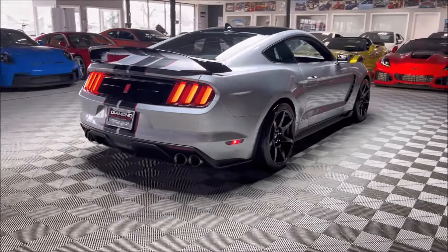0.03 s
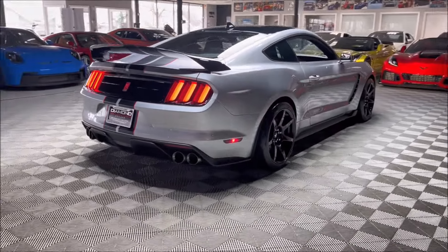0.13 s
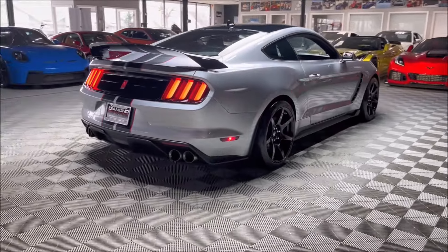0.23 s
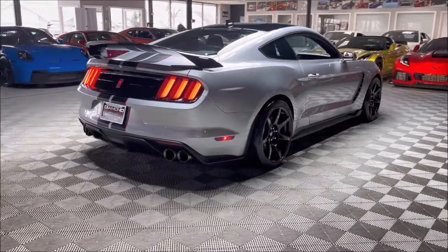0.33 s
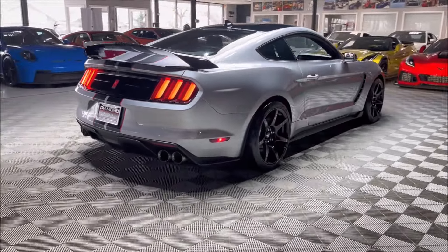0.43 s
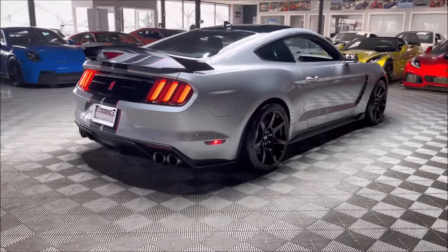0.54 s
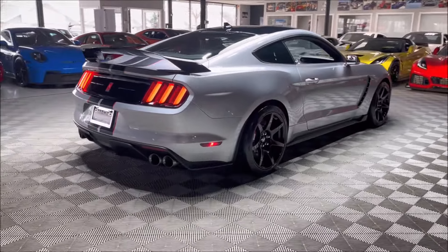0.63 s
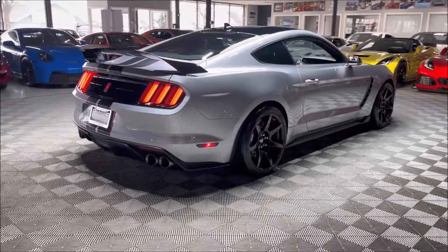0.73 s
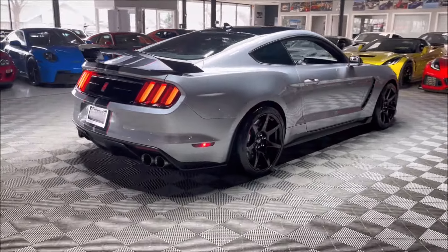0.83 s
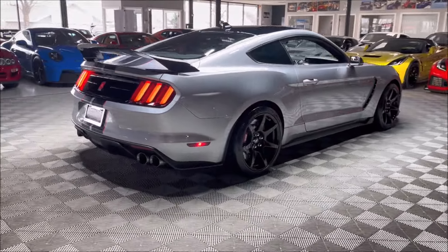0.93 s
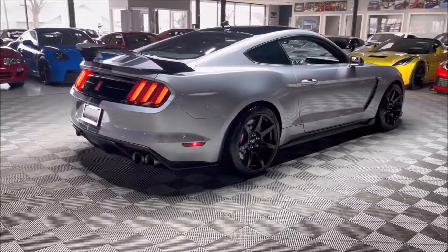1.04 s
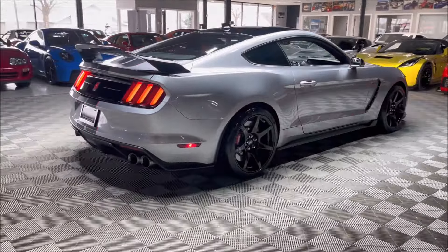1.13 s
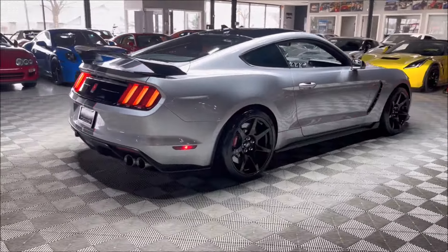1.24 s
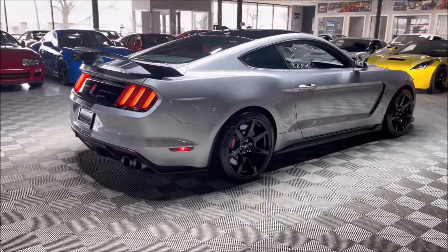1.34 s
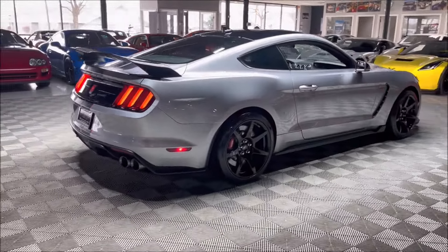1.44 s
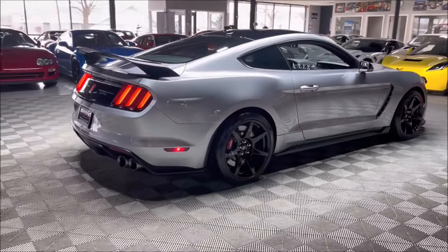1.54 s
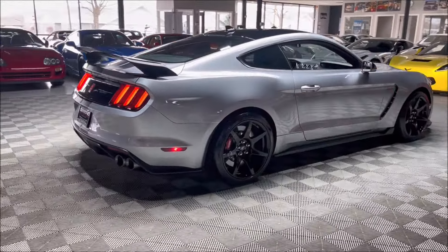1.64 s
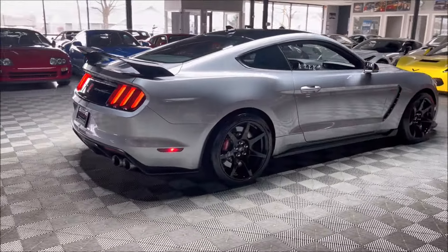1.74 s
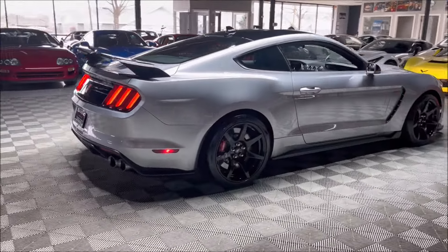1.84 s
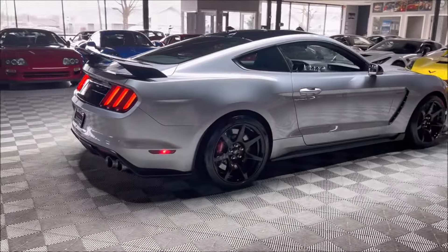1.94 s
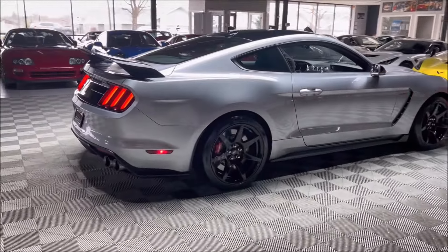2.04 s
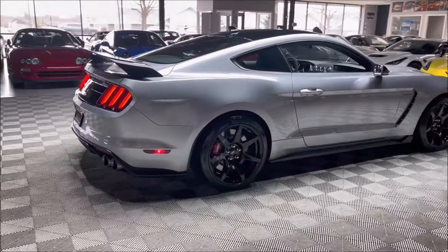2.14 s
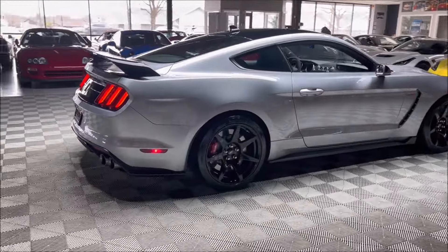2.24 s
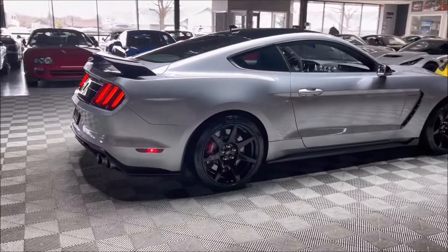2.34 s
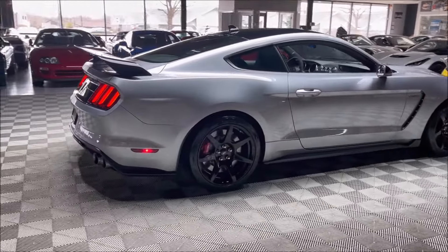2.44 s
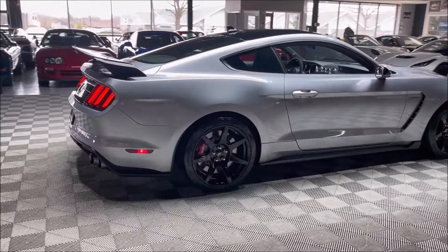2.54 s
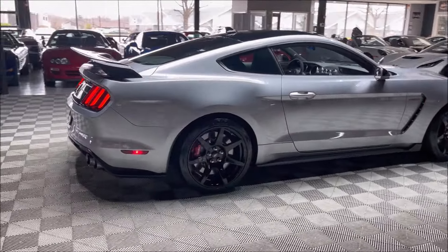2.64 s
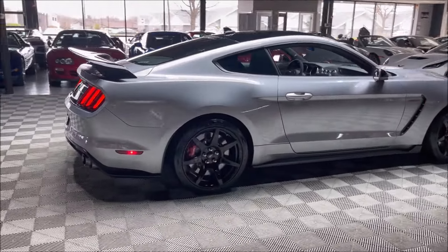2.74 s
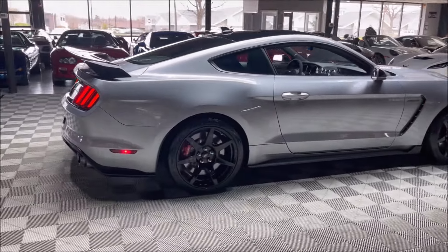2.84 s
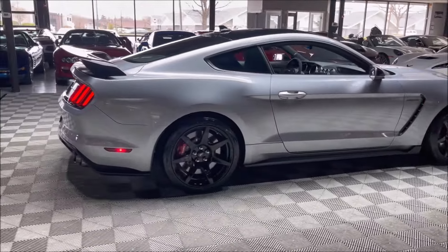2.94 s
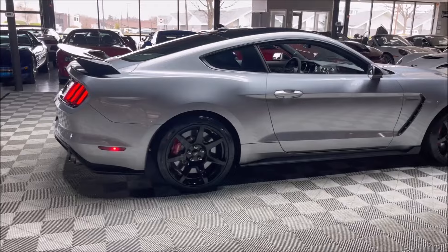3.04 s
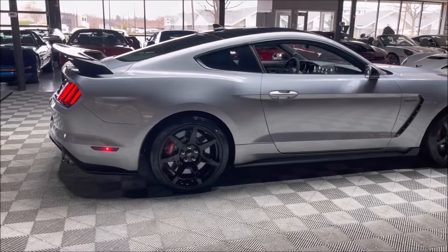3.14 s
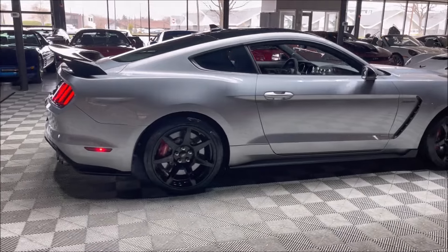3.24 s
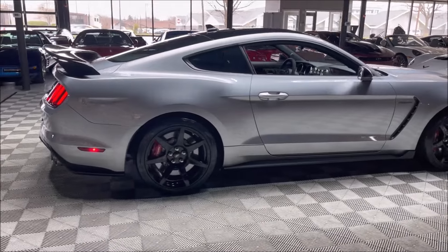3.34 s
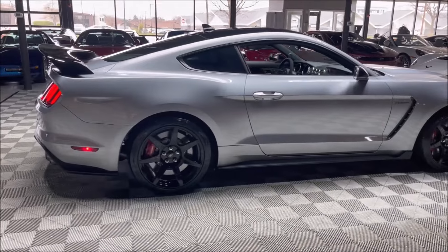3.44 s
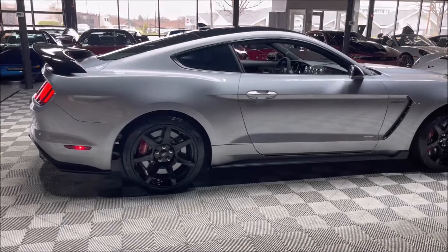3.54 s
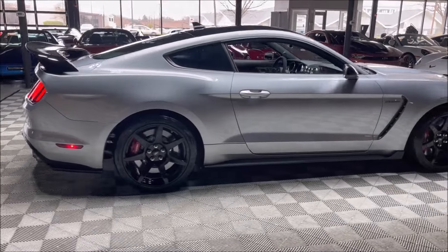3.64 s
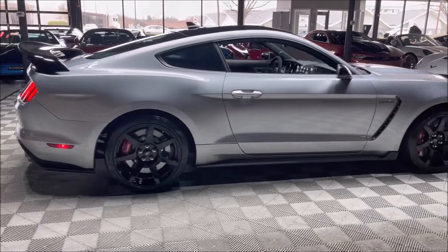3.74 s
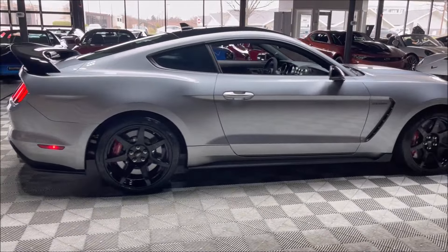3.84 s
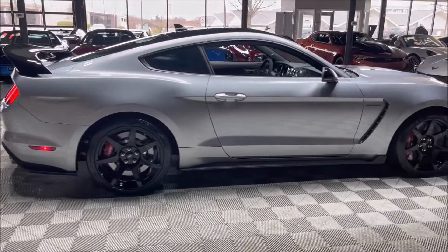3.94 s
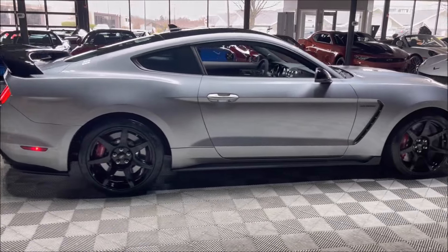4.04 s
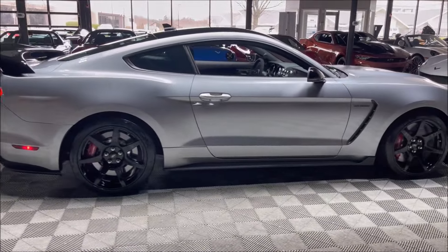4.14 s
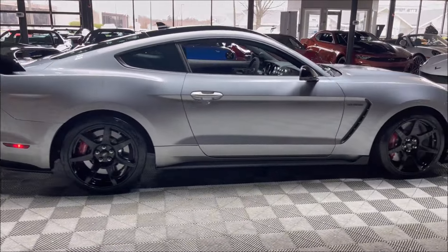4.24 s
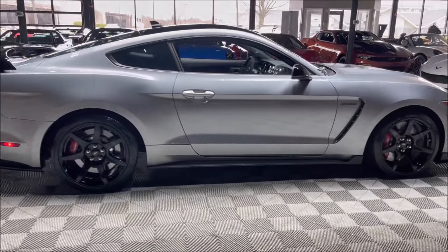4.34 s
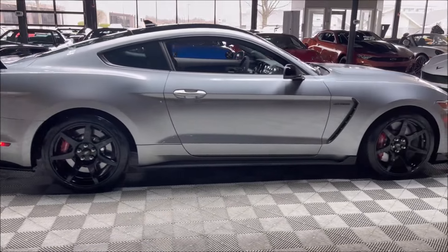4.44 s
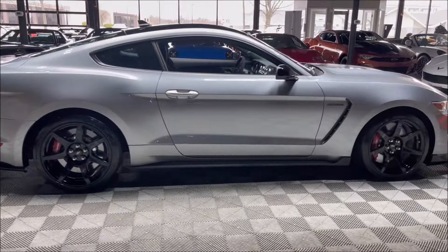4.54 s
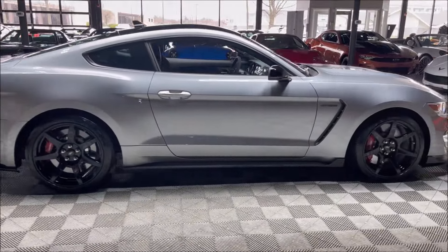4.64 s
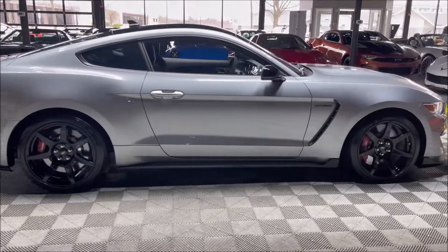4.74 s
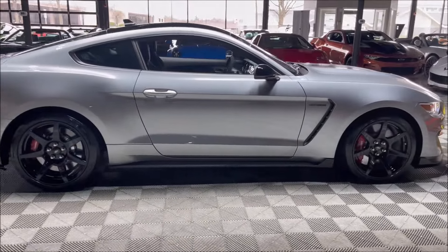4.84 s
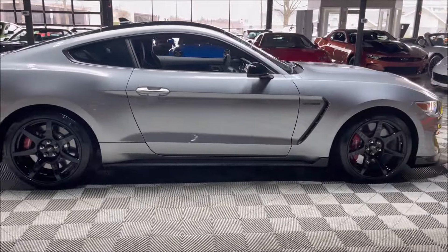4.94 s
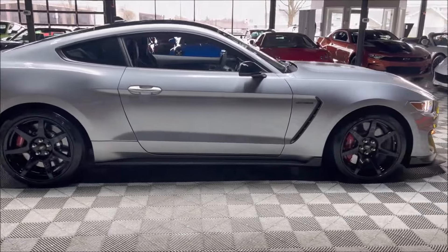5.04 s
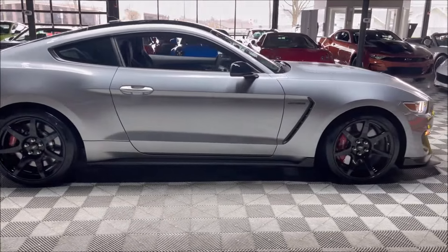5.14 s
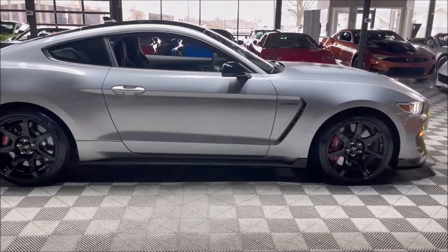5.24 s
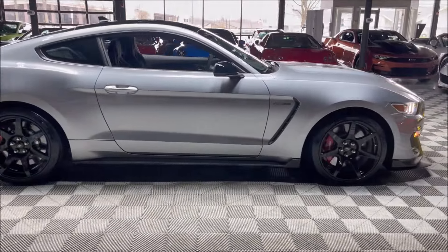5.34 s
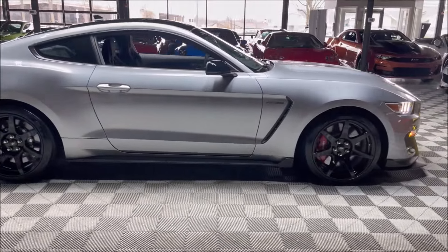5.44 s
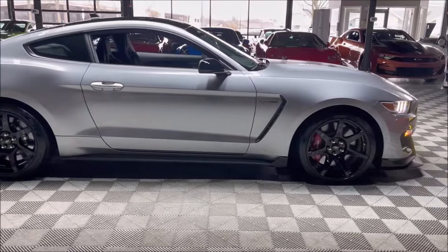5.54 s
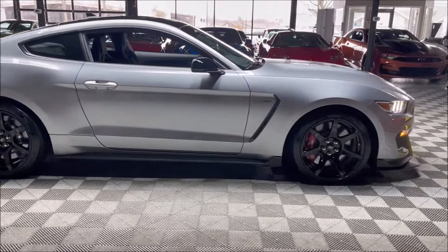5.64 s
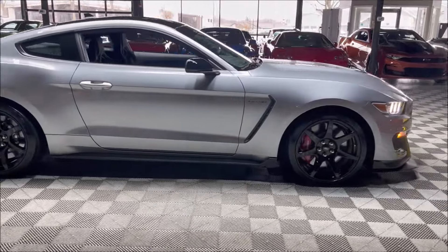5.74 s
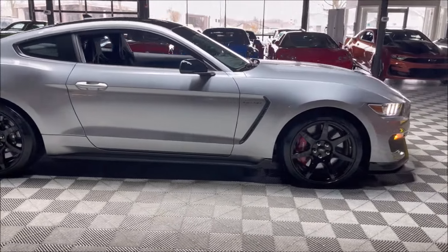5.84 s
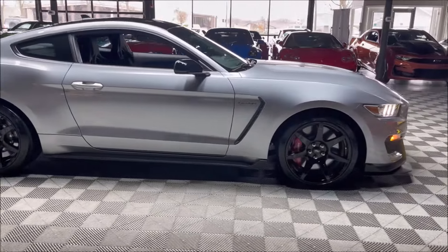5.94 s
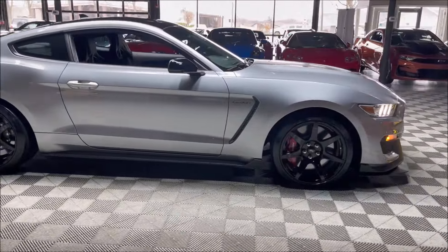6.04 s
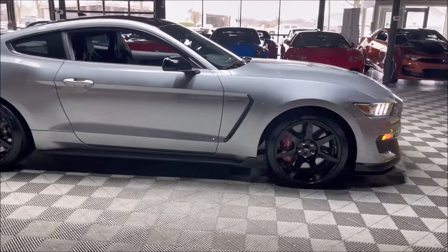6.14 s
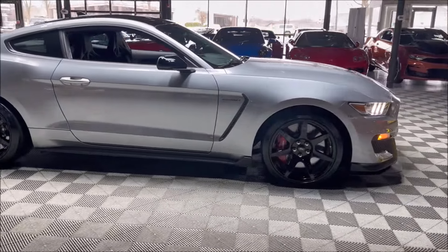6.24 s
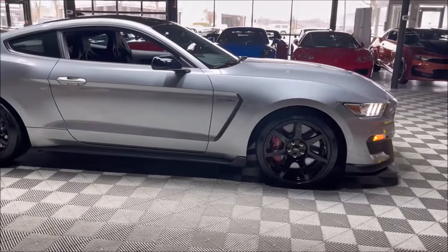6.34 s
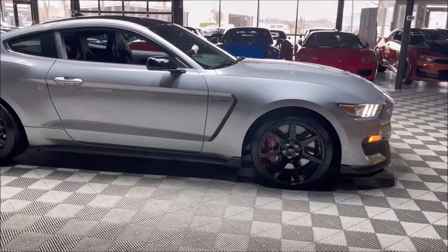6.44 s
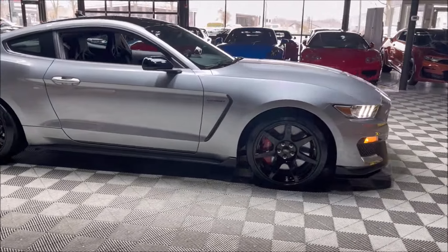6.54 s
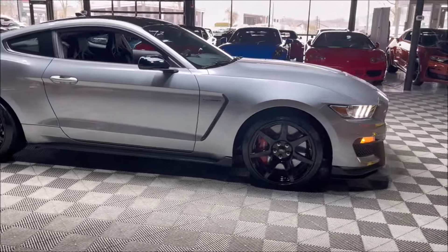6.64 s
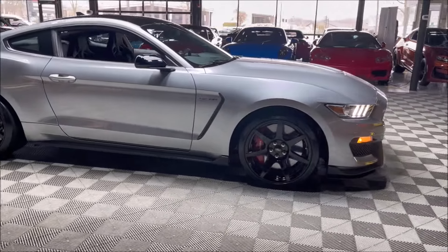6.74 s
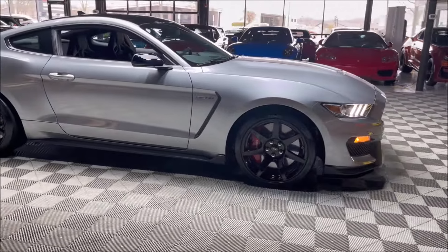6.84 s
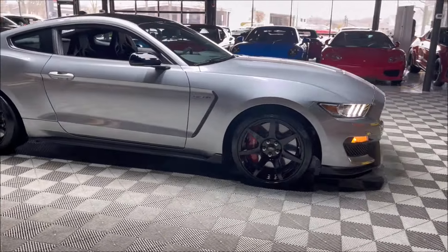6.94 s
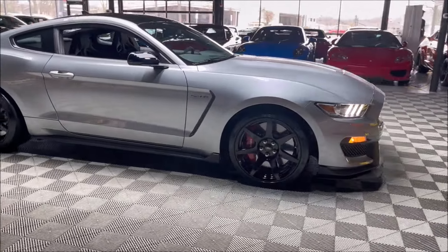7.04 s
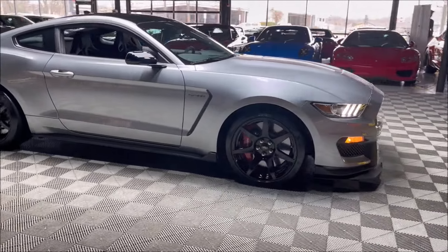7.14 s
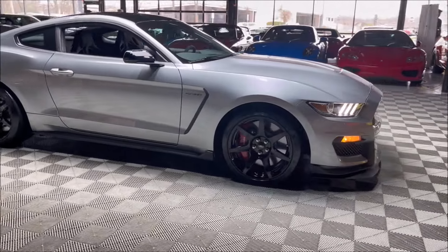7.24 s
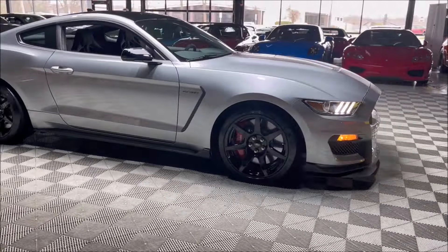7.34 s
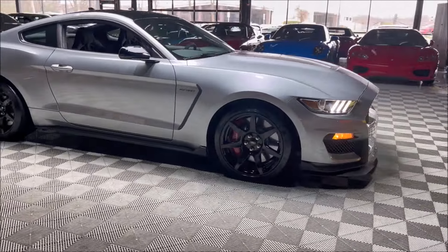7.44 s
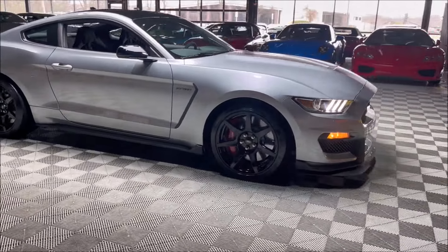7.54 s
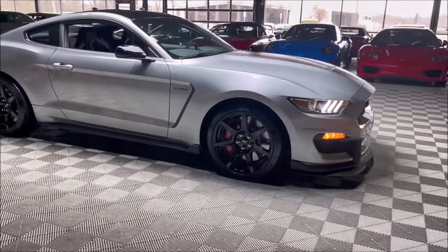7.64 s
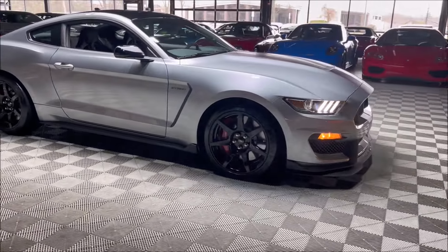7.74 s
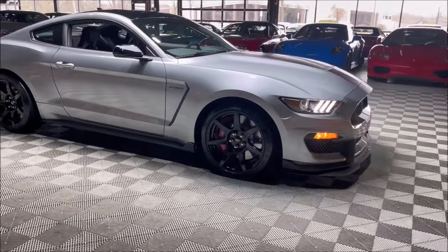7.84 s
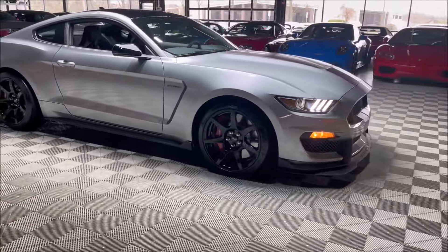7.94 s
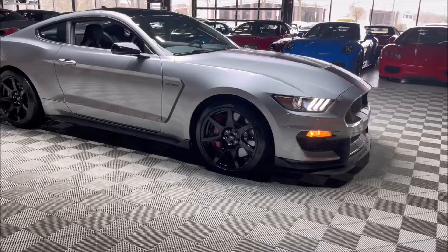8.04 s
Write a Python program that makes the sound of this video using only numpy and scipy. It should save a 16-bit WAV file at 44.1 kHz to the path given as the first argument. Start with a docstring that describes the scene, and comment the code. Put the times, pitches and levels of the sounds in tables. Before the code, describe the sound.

A big eight-cylinder petrol engine idles from start to finish, about eight seconds, in a hard-floored showroom. Its deep firing tone, near 53 hertz, drones loudly with only slight speed wander; there is no revving. Above it lie a lumpy, uneven burble repeating several times a second, pulsing breathy exhaust gas and faint mechanical rustle. During the first second a loose tailpipe tip knocks and rattles irregularly, thin and metallic near 2.9 kilohertz, fading away by about 3. The close stereo microphone moves from tail to nose, so gas noise gradually softens and light valve-gear noise becomes slightly clearer. The bass weakens from 3.5, almost drops out around 4.6, returns near 5, sinks again around 5.9, stays thin until 6.5, then swells back through the end. Tiny dry, bright clicks come near 0.4, 1.8, 3.1, 5.7, 6.3, 6.9 and 7.6.

```python
"""A big eight-cylinder petrol engine idles in a hard-floored showroom; two microphone ports move from tail to nose.
From the start the firing tone booms, unequal cylinders fill in the orders of the four-stroke cycle, and gas puffs
and valve gear rustle above. A loose tailpipe tip, ringing at each knock, rattles early on and fades.
A few dry noise-burst clicks sound nearby, from the first second to the last.
In the second half the firing tone sinks at two nulls of the hall's standing wave."""
import sys
import numpy as np
from scipy import signal
from scipy.fft import rfft, irfft
from scipy.io import wavfile
from scipy.ndimage import uniform_filter1d

SR = 44100
rng = np.random.default_rng(int(sys.argv[2]) if len(sys.argv) > 2 else 0)


def store_pcm(level_fs):
    """Save levels as 16-bit WAV."""
    pcm = np.round(np.clip(level_fs, -1, 1) * 32767).astype(np.int16)
    wavfile.write(sys.argv[1], SR, np.atleast_2d(pcm).T)


N = 356328
TOP_HZ = 15700

# noise colour and its sharing between the ports, levels relative:
# [f/Hz, sum level/dB, difference level/dB, linked share 0-1]
PORT_SPECTRA = [(30, -86.5, -120, 1), (130, -74, -90, 1), (200, -66, -82.5, .85), (332, -66, -77.5, 0.7),
                (444, -67, -75, .6), (695, -69.5, -72.5, 0.4), (1010, -76, -77, 0.2),
                (1250, -80.5, -83.5, .2), (1490, -80.5, -78.5, .1), (1590, -78, -75, .1),
                (1660, -78, -83.5, .1), (1900, -79, -87.5, .2), (2540, -83.5, -89, .4),
                (3020, -85.5, -89, .4), (3700, -89, -93, .3), (4500, -94, -97, .1), (6000, -98, -101, .1),
                (7300, -101, -96, .3), (7700, -112, -95, .3), (8800, -112, -94, .3), (9300, -101, -96, .7),
                (10200, -98, -98, .75), (10500, -102, -104, .5), (13000, -106, -113, .1),
                (13900, -112, -110, .1), (15000, -130, -109, .1)]


def undb(db):
    """Amplitude ratio of a level in decibels."""
    return 10 ** (np.asarray(db) / 20)


def unit(x):
    """Normalisation to a root-mean-square value of 1."""
    return x / np.sqrt(np.mean(np.abs(x) ** 2))


def curves(table):
    """Linear interpolation in time: each column after t/s, sample by sample."""
    s, *columns = np.transpose(table)
    return [np.interp(np.arange(N) / SR, s, c) for c in columns]


def frequencies():
    """Frequencies of the Fourier bins in Hz, at least 1 so that a logarithm exists."""
    return np.maximum(np.arange(N // 2 + 1) * SR / N, 1)


def log_interp(f, hz, values):
    """Interpolation on a logarithmic frequency axis."""
    return np.interp(np.log(f), np.log(hz), values)


def band(x, lo_hz, hi_hz, order=2):
    """Band-pass filtering with a maximally flat response."""
    return signal.sosfilt(signal.butter(order, [lo_hz, hi_hz], "bandpass", fs=SR, output="sos"), x)


def wander(rate, count, size):
    """Band-limited complex chance: smooth rows that change about rate times a second."""
    knots = int(8 + rate * N / SR)
    z = rng.standard_normal((count, knots)) + 1j * rng.standard_normal((count, knots))
    return unit(signal.resample(z, size, axis=1))


def handover(tail_db, nose_db, half_s, spread_s):
    """Logistic transition of a level from its value at the tail towards its value at the nose."""
    return tail_db + (nose_db - tail_db) / (1 + np.exp(-(np.arange(N) / SR - half_s) / max(spread_s, .05)))


def spots(level_db, *places):
    """Interference along a path: a steady level with bell-shaped loud or dead spots."""
    t = np.arange(N) / SR
    return level_db + sum(db * np.exp(-((t - s) / width) ** 2) for s, width, db in np.reshape(places, (-1, 3)))


def engine_cycle():
    """Phase is the integral of rate: four-stroke cycles run so far, with eight firings in each."""
    # idle speed: [t/s, firing rate f/Hz]
    idle = [(0.15, 52.79), (0.4, 52.61), (1.0, 53.31), (1.85, 53.97), (2.2, 53.74), (2.6, 53.05),
            (3.15, 53.25), (3.7, 53.1), (4.05, 52.55), (4.9, 53.7), (6.35, 53.9), (6.95, 53.17),
            (7.9, 52.8)]
    return np.cumsum(curves(idle)[0]) / SR / 8


def tones(cycle):
    """Periodic firing drives clean pipe tones at 1, 1.5 and 2 times its rate, each a little unsteady."""
    # firing tone along the walk through the standing wave: [t/s, level/dB]
    boom = [(0.1, -7.5), (2.37, -8.5), (3.31, -10.5), (3.93, -13), (4.48, -27.5), (4.57, -44.5),
            (4.68, -18), (4.81, -12.5), (4.96, -12), (5.23, -15.5), (5.54, -14.5), (5.75, -17),
            (5.91, -34.5), (6.04, -21), (6.48, -21.5), (6.85, -13.5), (8.0, -11.5)]
    # upper pipe tones along the walk: [t/s, level at 1.5 x firing/dB, level at 2 x firing/dB]
    overtones = [(0.6, -33.5, -34.5), (1.5, -40.5, -31.5), (2.15, -36.5, -30.5), (2.6, -34, -37),
                 (3.6, -30, -39), (4.85, -28, -41), (5.75, -36.5, -27), (6.6, -47, -23),
                 (7.1, -32.5, -27.5), (7.6, -37, -32.5)]
    levels_db = [*curves(boom), *curves(overtones)]
    shake = 1 + wander(9, count=3, size=N) * np.array([[.015], [.15], [.2]])
    turns = np.array([[8], [12], [16]]) * cycle
    waves = np.imag(shake * np.exp(2j * np.pi * turns))
    return np.sqrt(2) * np.sum(undb(levels_db) * waves, axis=0)


def burble(cycle, drift=.6, rough=.4, sweep=.045, lope_db=-27.5, step=20):
    """Fourier orders of unequal cylinders; echoes reshuffle them on the walk, and no two cycles match."""
    # orders of the four-stroke cycle: [multiple of the cycle rate, relative level/dB]
    orders = [(4, -58), (7, -44), (9, -36), (10, -36), (11, -44), (14, -46), (15, -47), (17, -46),
              (18, -33), (19, -46), (20, -39), (21, -37), (24, -38), (25, -40), (26, -39), (27, -39),
              (28, -48), (32, -48), (33, -44), (34, -37), (35, -42), (36, -42), (37, -44), (38, -44),
              (42, -41), (44, -46), (45, -40), (48, -43), (49, -45), (50, -41), (54, -50), (55, -49),
              (56, -41), (57, -52), (63, -52), (64, -52)]
    # exhaust resonances, the first around the firing tone:
    # [highest order carried, place in the cycle where it rings 0-1, spread of that place 0-1]
    chambers = [(15, .3, .5), (22, .1, .2), (30, .53, .18), (39, .42, .11), (47, .5, .15), (51, .79, .08),
                (65, .98, .3)]
    # the other six resonances, with two loud or dead spots each in the hall:
    # [level/dB, t/s, half width/s, change/dB, second t/s, half width/s, change/dB]
    hall_spots = [(-30.5, 5.3, 1.1, 4.5, 3.2, 0.74, -4), (-30.5, 1.7, .3, -9.5, 5.13, .4, -7),
                  (-35.5, 3.76, 1.87, 6, .9, .3, 4.5), (-37.5, 2.3, 0.7, 8, 4.8, .9, 4.5),
                  (-35, 2.4, 0.45, -5.5, 6.5, 0.94, -5), (-39, 4.7, .9, 4.5, 1.3, 1.5, 4)]
    order, db = np.transpose(orders)[:, :, None]
    order = np.round(order)
    slow = cycle[::step]  # low orders need only a low sample rate
    top, place, spread = np.transpose(chambers)
    chamber = np.searchsorted(np.round(top), order[:, 0])

    # the deepest orders are the steadiest
    roughness = rough * np.minimum(order / 24, 1)
    gain = 1 + drift * wander(1.3, count=len(order), size=len(slow))
    gain = gain + roughness * wander(12, count=len(order), size=len(slow))

    # orders of one resonance line up where it rings, which makes a beat once a cycle
    start = spread[chamber, None] * rng.standard_normal(order.shape)
    # higher orders arrive later, so each beat glides upward
    start -= sweep * (order - top[chamber, None] + 4) ** 2 / 2
    turns = order * (slow - place[chamber, None]) + start
    waves = undb(db) * np.imag(gain * np.exp(2j * np.pi * turns))

    levels_db = [np.full(N, lope_db), *[spots(*row) for row in hall_spots]]
    rings = [unit(waves[chamber == k].sum(axis=0)) * undb(level[::step]) for k, level in enumerate(levels_db)]
    return signal.resample_poly(np.sum(rings, axis=0), step, 1)[:N]


def puffs(cycle, decay, scatter_db, steady):
    """Impulsive excitation and decay: a jump at each firing dies away into the hall's steady wash."""
    # puff strength of the cylinders in firing order: [relative level/dB]
    cylinders = [0, -3, -1, -4, 0, -3, -1, -4]
    firing = 8 * cycle
    k = firing.astype(int)
    scatter = scatter_db * rng.standard_normal(k[-1] + 1)
    size = undb(np.array(cylinders)[k % 8] + scatter[k])
    decaying = size * np.exp(-(firing - k) / decay)
    return unit(steady + uniform_filter1d(decaying, size=300))


def repeating(cycle, firing_share, hold_s):
    """Cyclostationary noise, partly alike at every firing; its pattern changes as the echo paths do."""
    size, count = 6400, 40  # points in a cycle, patterns in stock
    each_firing = np.tile(rng.standard_normal((count, size // 8)), 8)
    patterns = firing_share * each_firing + rng.standard_normal((count, size))
    spot = np.arange(N) / SR / hold_s
    i = (cycle % 1 * size).astype(int)
    k = spot.astype(int)
    fade = np.pi / 2 * (spot - k)  # equal-power crossfade
    return unit(patterns[k % count, i] * np.cos(fade) + patterns[(k + 1) % count, i] * np.sin(fade))


def rustle_levels():
    """Distance and shielding: levels in dB of three gas bands, two block bands, valve gear and hiss on the walk."""
    # exhaust gas, lower block, upper block, valve gear, hiss:
    # [level at the tail/dB, level at the nose/dB, halfway t/s, spread/s]
    tail_to_nose = [(-36, -39.5, 3.6, 1.2), (-48, -53, 2.3, 0.25), (-53, -51.5, 5.2, .4),
                    (-55.5, -52, 4.3, 0.34), (-61, -59.5, 2.2, .5)]
    # low, middle and upper gas against the gas level: [relative level/dB]
    gas_bands = [0, -4.5, -8]
    # beside the car; added to middle gas and taken from low gas: [t/s, change/dB]
    flank = [(0, -3), (1.5, 0), (2.8, 0), (4.2, 2.5), (5.5, 0.5), (6.5, -0.5), (8, -0.5)]
    gas_db, *metal_db = [handover(*row) for row in tail_to_nose]
    low_db, middle_db, upper_db = gas_db + np.array(gas_bands)[:, None]
    flank_db = curves(flank)[0]
    return [low_db - flank_db, middle_db + flank_db, upper_db, *metal_db]


def rustle(cycle):
    """Amplitude-modulated noise of gas, block, gear and hiss; a second draw feeds the ports' difference."""
    # narrow pipe and panel resonances: [f/Hz, width/Hz, lift/dB]
    pipes = [(402, 7.1, 2.5), (440, 9.9, 3.5), (476, 20, 1.5), (526, 13, 3), (584, 26, 5), (660, 21, 7),
             (761, 30, 6.5), (840, 25, 5.5), (922, 27, 5.5), (1055, 23, 6), (1450, 23, 5.5),
             (1714, 36, 4.5), (2900, 240, 1.5)]
    # handover between the seven bands, from low gas up to hiss: [f/Hz]
    splits = [558, 821, 1234, 1750, 2440, 4180]
    # low, middle, upper gas, lower, upper block, gear, hiss:
    # [relative gain of the repeating part, steady wash under the puffs]
    pulsing = [(2., 1.3), (2.2, 1.3), (1.6, 1.3), (1.3, 1.2), (1.3, 1.2), (.8, 1.4), (.2, 1.6)]
    hz, sum_db = np.transpose(PORT_SPECTRA)[:2]
    f = frequencies()
    resonance_db = sum(db / (1 + (2 * (f - centre) / width) ** 2) for centre, width, db in pipes)
    colour = undb(log_interp(f, hz, sum_db)) * undb(resonance_db)
    below = [0] + [1 / (1 + (f / split) ** 12) for split in splits] + [1]
    levels_db = rustle_levels()
    out = 0
    for k, (repeat, steady) in enumerate(pulsing):
        pattern = np.array([repeating(cycle, firing_share=.5, hold_s=.6) for _ in range(2)])
        noise = repeat * pattern + rng.standard_normal((2, N))
        noise *= puffs(cycle, decay=.5, scatter_db=2.8, steady=steady)  # decay in firing intervals
        noise *= undb(.8 * wander(7, count=1, size=N).real)  # each band swells on its own
        window = colour * (below[k + 1] - below[k])
        out = out + unit(irfft(rfft(noise) * window, N)) * undb(levels_db[k])
    return out


def shaken(cycle, times, place, level_db, scatter_db, hz, spread_hz, fade_s):
    """Forced impacts, times a cycle at a place 0-1 between repeats, lost as the ports leave the tail."""
    s = np.flatnonzero(np.diff(np.floor(times * cycle - place))) / SR
    chance = rng.standard_normal((len(s), 2))
    strength_db = level_db + scatter_db * chance[:, 0] - 9 * (s / fade_s) ** 2
    return np.c_[s, strength_db, hz + spread_hz * chance[:, 1]][s < 2 * fade_s]


def rattle(cycle, attack_s=.0006, decay_s=.007, partner_hz=120, buzz_db=-57, fade_s=1.6):
    """Damped modal ringing of a loose tailpipe tip, with a faint valve tick once a cycle; the tip's buzz
    between knocks fades as the ports leave the tail."""
    # main knocks: [t/s, level/dB, ring f/Hz]
    main_knocks = [(0.0893, -42, 2980), (0.1292, -35.5, 2880), (0.227, -42.5, 2910), (0.3197, -44, 2790),
                   (0.3572, -36, 2900), (0.3943, -33, 2970), (0.4355, -45, 2930), (0.4714, -48.5, 3020),
                   (0.5088, -45, 2880), (0.5852, -32, 2720), (0.659, -45, 2740), (0.6974, -42, 2820),
                   (0.8111, -37, 2760), (0.887, -45.5, 2860), (0.9608, -38, 2980)]
    # lesser knocks: [level/dB, scatter/dB, ring f/Hz, spread/Hz, t/s by which 9 dB is lost]
    small_knocks = (-43, 3, 2880, 100, 1.5)
    # faint higher tick: [level/dB, scatter/dB, ring f/Hz, spread/Hz, t/s by which 9 dB is lost]
    faint_tick = (-50, 3, 5100, 120, 1.6)
    small = shaken(cycle, 4, .41, *small_knocks)
    ticks = shaken(cycle, 1, .75, *faint_tick)
    out, t = np.zeros(N), np.arange(1500) / SR
    envelope = (1 - np.exp(-t / attack_s)) * np.exp(-t / decay_s)
    close_modes = .55 + .45 * np.cos(2 * np.pi * partner_hz * t)  # one on each side of the ring
    for s, db, hz in [*main_knocks, *small, *ticks]:
        i = int(s * SR)
        out[i:i + len(t)] += undb(db) * envelope * np.sin(2 * np.pi * hz * t) * close_modes
    buzz = unit(band(rng.standard_normal(N), 2760, 3080))
    return out + undb(buzz_db) * buzz * np.exp(-(np.arange(N) / SR / fade_s) ** 2)


def clicks():
    """Transient excitation: short dry noise bursts with a fast decay and a thin slower tail."""
    # bright snap and lower treble: [t/s, snap peak level/dB, ring f/Hz, lower treble level/dB before a 7 dB cut]
    click_table = [(0.3566, -63, 10300, -10), (1.8382, -46, 10700, 1), (3.0545, -50.5, 10700, -10),
                   (5.7483, -41, 11700, -15), (6.2642, -42, 10200, -13), (6.9082, -38, 11800, -14),
                   (7.5652, -39, 10900, -8)]
    out, t = np.zeros(N), np.arange(600) / SR
    noise = rng.standard_normal((len(click_table), 2, len(t)))
    shape = np.exp(-t / .001) + .3 * np.exp(-t / .006)
    for (s, db, hz, body_db), (bright, dull) in zip(click_table, noise):
        snap = band(bright * shape, hz - 1200, min(hz + 3000, TOP_HZ))
        body = band(dull * shape, 4000, 9000)
        mix = snap / np.abs(snap).max() + undb(body_db - 7) * body / np.abs(body).max()
        i = int(s * SR)
        out[i:i + len(t)] += undb(db) * mix
    return out


def ports(x, other, top_hz):
    """Partial coherence of two ports: sum and difference, whose linked part is a quarter wave ahead."""
    hz, sum_db, diff_db, link = np.transpose(PORT_SPECTRA)
    f = frequencies()
    ratio = undb(log_interp(f, hz, diff_db - sum_db)) / (1 + (f / top_hz) ** 8)
    link = np.clip(log_interp(f, hz, link), 0, 1)
    linked = 1j * link * rfft(x)
    unlinked = np.sqrt(1 - link ** 2) * rfft(other)
    side = irfft(ratio * (linked + unlinked), N)
    return np.array([x + side, x - side])


def scene():
    """Superposition of engine and clicks, as the two ports receive them."""
    cycle = engine_cycle()
    exhaust = tones(cycle) + burble(cycle)
    noise, other = rustle(cycle)
    later_echo = np.roll(exhaust, 900)  # feeds the difference of the ports
    deep = ports(exhaust, later_echo, 600)
    return deep + ports(noise + rattle(cycle), other, SR) + clicks()


def record(dry, left_db=1.13):
    """Port sensitivity and bandwidth: the left is a little louder than the right; a steep low-pass cuts the top."""
    tilt = undb(np.array([[left_db], [-left_db]]) / 2)
    return signal.sosfilt(signal.ellip(10, .2, 70, TOP_HZ, fs=SR, output="sos"), dry * tilt)


dry = scene()
out = record(dry)
store_pcm(out)
```